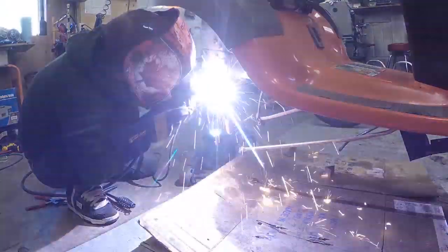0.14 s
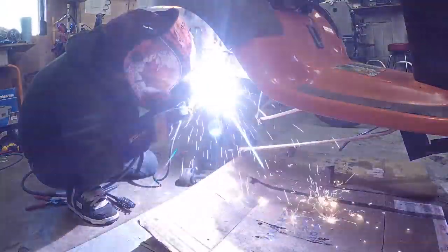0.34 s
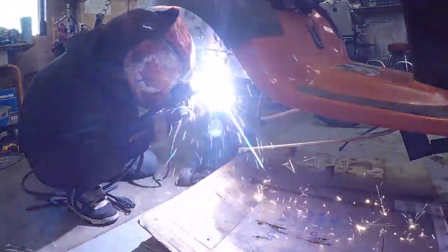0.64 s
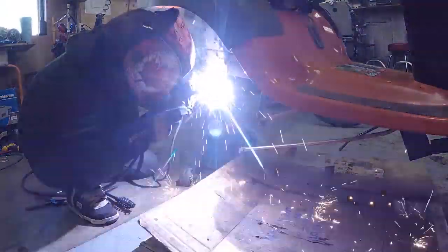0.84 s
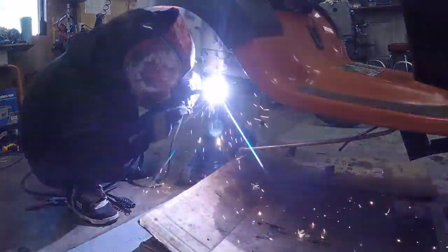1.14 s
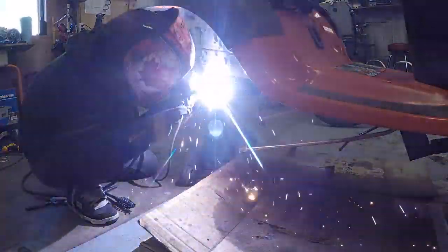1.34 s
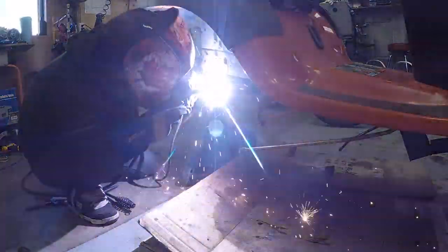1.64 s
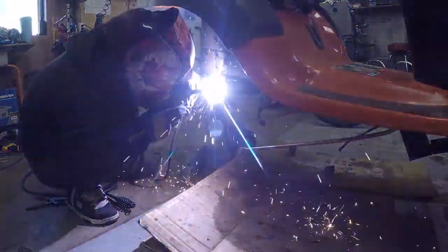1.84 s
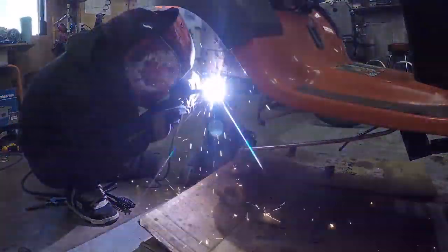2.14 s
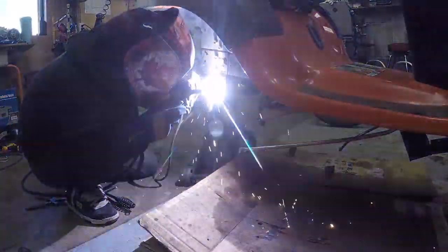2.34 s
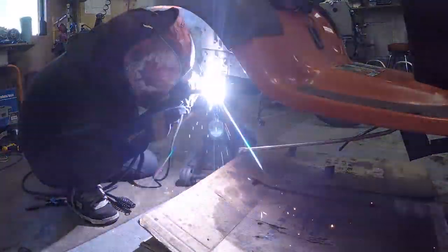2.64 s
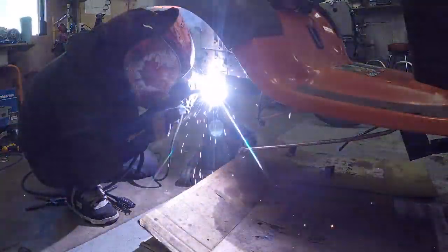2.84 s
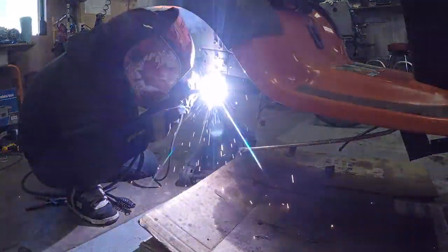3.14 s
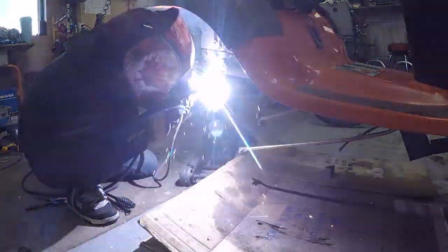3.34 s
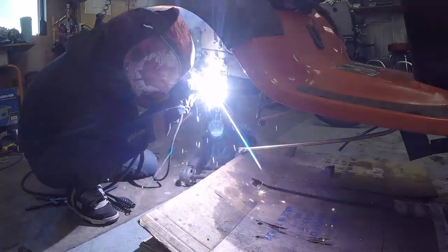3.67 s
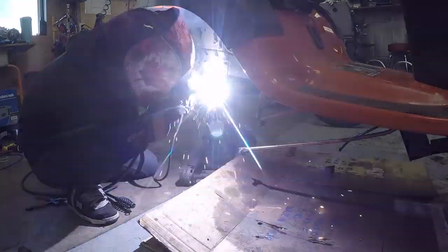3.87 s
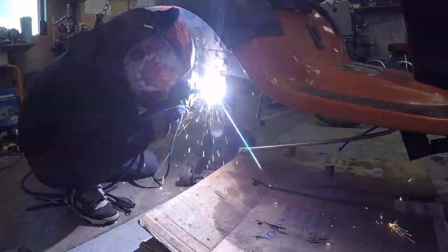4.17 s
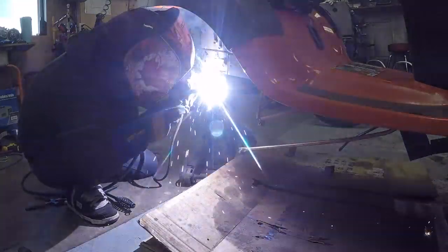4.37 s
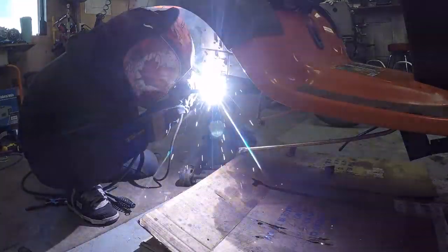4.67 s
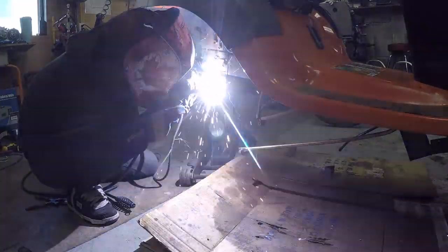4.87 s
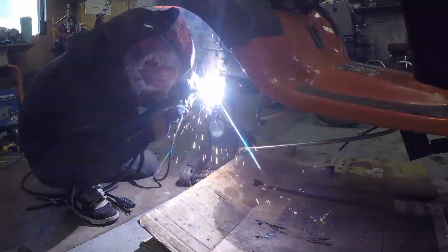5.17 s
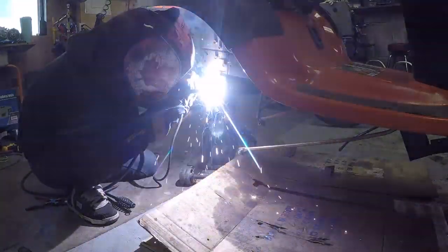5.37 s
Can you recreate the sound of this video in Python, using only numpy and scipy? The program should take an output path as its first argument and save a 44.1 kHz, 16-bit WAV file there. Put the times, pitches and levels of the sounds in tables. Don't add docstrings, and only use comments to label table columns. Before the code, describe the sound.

A crouching welder works an arc on a steel part in a cluttered workshop, heard in mono from fairly close. The arc is burning from the start: dense one-sided sizzle mixed with sharp, irregular pops, dozens each second, bright and slightly metallic. From 0 to 1.8 s it is rough and stuttering, strong at the start and again around 0.9-1.3 s; the crackle repeatedly sinks for under two tenths of a second, then snaps back with a pop. After about 1.8 s it runs quieter and steadier, with fewer stalls. At 3.3 s one pop stands out, much louder and with a dull thump. Moderate crackling continues, with stutters near 4.1, 4.8 and 5.4 s, and is cut off still running at 5.5 s. Beneath it all is a constant low transformer hum, soft deep fan rumble with a slightly wavering tone, and a very faint whine. Quick echoes and a short room tail follow the pops.

```python
import sys
import numpy as np
from scipy import signal
from scipy.fft import rfft, irfft
from scipy.io import wavfile
from scipy.ndimage import uniform_filter1d

SR = 44100
rng = np.random.default_rng(int(sys.argv[2]) if len(sys.argv) > 2 else 0)


def output_pcm(signal):
    pcm = np.clip(np.atleast_2d(signal).T, -1, 1) * 32767
    wavfile.write(sys.argv[1], SR, np.round(pcm).astype(np.int16))


def nominal_scale(level):
    x = np.asarray(level, float) / 20
    return 10 ** x


N = 242991

# [restrike t/s, stall length/s, depth level/dB, restrike peak level/dB]
STALLS = [(0.076, 0.065, -8, -18.5), (0.117, 0.059, -16, -19.5), (0.4396, 0.088, -6.5, -20),
          (0.5873, 0.043, 0.5, -17), (0.7433, .055, -15, -17), (0.862, 0.059, -3, -19.5),
          (1.065, 0.12, -13.5, -19), (1.151, 0.088, -8.5, -24), (1.2026, 0.05, -10, -19),
          (1.431, 0.17, -12, -21.5), (1.704, 0.053, -18, -20.5), (1.75, 0.044, -8, -18),
          (2.106, 0.12, -15, -19), (2.159, 0.054, -1.5, -20.5), (2.3556, 0.023, -25, -14),
          (2.4627, .045, -3, -22.5), (2.788, 0.051, -6.5, -22), (3.0858, 0.087, -9, -26),
          (3.455, 0.078, -8, -19.5), (3.75, 0.079, -6, -27), (3.791, 0.036, -14.5, -20),
          (4.0458, 0.093, -9.5, -22.5), (4.093, 0.054, -12, -21), (4.3265, 0.04, -8, -19.5),
          (4.422, .04, -6.5, -21), (4.7836, 0.16, -8.5, -19.5), (4.881, 0.051, 0, -20),
          (5.104, 0.13, -8.5, -26), (5.338, 0.023, -12, -16), (5.4205, 0.11, -9.5, -15.5)]


def rms_one(x):
    return x / np.sqrt(np.mean(x ** 2) + 1e-20)


def drift(rate_hz):
    r = np.exp(-2 * np.pi * rate_hz / SR)
    noise = rng.standard_normal(N + SR)
    wander = signal.lfilter([1], [1, -2 * r, r * r], noise)
    return rms_one(wander[SR:])


def colour_db(hz, spectrum, lifts):
    points = np.array(spectrum)
    level_db = np.interp(np.log(hz + 1), np.log(points[:, 0]), points[:, 1])
    for centre, width, lift_db in lifts:
        level_db = level_db + lift_db / (1 + (2 * (hz - centre) / width) ** 2)
    return level_db


def causal(level_db):
    cepstrum = irfft(level_db * np.log(10) / 20)
    half = len(cepstrum) // 2
    cepstrum[1:half] *= 2
    cepstrum[half + 1:] = 0
    return np.exp(rfft(cepstrum))


def rumble():
    # [f/Hz, level/dB per Hz]
    air_colour = [(12, -39), (20, 1.5), (119, -6), (166, -6), (232, -4), (281, -8), (332, -2.5), (401, -12),
                  (784, -27), (1140, -29.5), (1570, -31), (1970, -32), (3000, -28), (3900, -34),
                  (6600, -120)]
    # [f/Hz, width/Hz, lift level/dB]
    booms = [(28, 3, -11), (44.5, 8.1, 8), (72.3, 6.7, 12), (86, 3.2, 11), (204, 33, 2.5), (230, 48, 3),
             (343, 4.4, -2), (633, 44, 4)]
    hz = np.fft.rfftfreq(N, 1 / SR)
    air = rfft(rng.standard_normal(N)) * nominal_scale(colour_db(hz, air_colour, booms))
    deep = hz < 105
    cabinet = abs(hz - 209) < 19
    steady = irfft(air * ~(deep | cabinet), N) / np.std(irfft(air, N))
    deep_db = -33 + 0.2 * drift(0.65)
    cabinet_db = -41.5 + 1.4 * drift(4.2)
    out = nominal_scale(-33) * steady
    for band, level_db in [(deep, deep_db), (cabinet, cabinet_db)]:
        out += nominal_scale(level_db) * rms_one(irfft(air * band, N))
    return out


def hum():
    harmonics_db = [-39.5, -31.5, -43.5, -35, -46.5, -44.5, -53, -97]
    mains_hz, fan_hz, whine_hz = 59.985, 327.86, 1746.84
    t = np.arange(N) / SR
    start = rng.uniform(0, 2 * np.pi, 10)
    lines = np.zeros(N)
    for k, level_db in enumerate(harmonics_db):
        line = np.sin(2 * np.pi * (k + 1) * mains_hz * t + start[k])
        lines += nominal_scale(level_db + 0.3 * drift(4)) * line
    fan = nominal_scale(-37.5 + 1.4 * drift(8.1)) * np.sin(2 * np.pi * fan_hz * t + 0.19 * drift(4.7))
    whine = nominal_scale(-60) * np.sin(2 * np.pi * whine_hz * t + 0.2 * drift(5.5))
    return np.sqrt(2) * (lines + fan + whine)


def path():
    # [delay t/ms, level/dB]
    near_echoes = [(0.0, -1), (.34, -8), (.49, -4), (1.03, 0), (1.25, -4), (1.42, -4), (1.66, -9),
                   (1.88, -6), (2.49, -11), (3.45, -10), (4.33, -10), (6.01, -9), (7.55, -8)]
    # [delay t/ms, spread/ms, level/dB]
    clutter = [(2.2, 1.0, -23), (7.4, 1.5, -22), (18, 1.5, -32)]
    # [f/Hz, level/dB per Hz]
    pop_colour = [(180, -23.5), (400, 1.5), (790, -11.5), (1400, -17.5), (2710, -5), (3600, -9.5),
                  (4940, -3.5), (6670, -11), (7590, -8.5), (9270, -14), (11200, -15), (12200, -13.5),
                  (14000, -8), (15300, -14)]
    # [f/Hz, width/Hz, lift level/dB]
    steel_rings = [(1140, 90, 13), (1975, 70, 7), (2310, 70, 2), (2760, 200, 5), (4240, 140, 4),
                   (4470, 60, 4), (4820, 90, 2), (5020, 130, 9), (5450, 120, 3), (7030, 100, 4),
                   (7330, 90, 3), (7690, 110, 6), (8550, 150, 3), (10200, 250, 4), (13000, 400, 2)]
    room_db, room_t60_s, room_top_t60_s = -25.5, 0.44, 0.38
    size = 2 ** 15
    ms = np.arange(size) * 1000 / SR
    hz = np.fft.rfftfreq(size, 1 / SR)

    noise = rng.standard_normal(size)
    dull = signal.sosfilt(signal.butter(2, 5000, fs=SR, output="sos"), noise)
    scatter = sum(nominal_scale(db) * np.exp(-0.5 * ((ms - at) / spread) ** 2) for at, spread, db in clutter)
    tail = dull * nominal_scale(-0.06 * ms / room_t60_s)
    tail += (noise - dull) * nominal_scale(-0.06 * ms / room_top_t60_s)
    room = nominal_scale(room_db) * tail * np.clip(ms / 8.1, 0, 1)
    diffuse = (noise * scatter + room) * (ms > 0.1)

    echoes = sum(nominal_scale(db) * np.exp(-2j * np.pi * hz * at / 1000) for at, db in near_echoes)
    arrivals = rfft(diffuse) + echoes
    broad_db = 10 * np.log10(uniform_filter1d(abs(arrivals) ** 2, size=450))
    pop = irfft(arrivals * causal(colour_db(hz, pop_colour, steel_rings) - broad_db))
    return pop / abs(pop).max()


def vigour_db():
    # [t/s, level/dB]
    vigour = [(0.0, -30.5), (0.14, -31), (0.27, -33.5), (0.62, -36.5), (0.8, -35), (0.95, -31.5),
              (1.27, -32), (1.57, -34.5), (1.8, -39), (1.95, -35.5), (2.6, -37), (2.92, -34.5),
              (3.2, -36.5), (3.6, -35), (3.92, -33.5), (4.4, -36.5), (4.92, -34.5), (5.51, -34)]
    sink_s, recover_s = 0.012, 0.033
    linger = 0.77
    t = np.arange(N) / SR
    level_db = np.interp(t, *np.transpose(vigour))
    for end, length, depth_db, _ in STALLS:
        sunk = 1 - np.exp(-np.clip(t - end + length, 0, length) / sink_s)
        healing = linger * np.exp(-np.clip(t - end, 0, None) / recover_s)
        level_db = level_db + depth_db * sunk * np.where(t < end, 1, healing)
    return level_db


def droplets(level_db):
    gap, size = rng.standard_normal((600, 2)).T
    t = np.cumsum(0.017 * np.exp(0.6 * gap))
    heard = t < (N - 1) / SR
    t, size = t[heard], size[heard]
    peak_db = level_db[(t * SR).astype(int)] + 11.5 + 3.5 * np.minimum(size, 1)
    return t, peak_db


def arc():
    # [t/s, peak level/dB]
    loud_pops = [(0.2033, -22), (0.2362, -17.5), (0.2499, -17), (0.2737, -17), (0.2911, -16), (0.3158, -16),
                 (0.373, -16), (0.6456, -15.5), (0.759, -17), (0.9184, -16), (0.933, -15), (0.964, -17),
                 (0.9752, -15), (1.2693, -16.5), (1.2961, -17), (1.5398, -15), (1.5818, -20), (1.9892, -26),
                 (2.5769, -18.5), (2.6465, -17.5), (2.7526, -19), (2.978, -18), (3.2289, -17.5),
                 (3.3135, -9.5), (3.3757, -27), (3.9631, -18.5), (4.6466, -17), (5.0022, -16.5),
                 (4.9444, -23), (5.1858, -17.5)]
    hush_db, hush_s = -70, 0.008
    body_db, body_hz, body_s = 8.0, 3520, 0.0066
    pop = path()
    level_db = vigour_db()

    restrikes = np.transpose(STALLS)[[0, -1]]
    t, peak_db = np.hstack([droplets(level_db), np.transpose(loud_pops), restrikes])
    clear = np.zeros(N)
    clear[(t * SR).round().astype(int).clip(0, N - 1)] = nominal_scale(peak_db + 2.5)

    r = np.exp(-1 / (hush_s * SR))
    short_circuit = signal.lfilter([0, 1], [1, -r], clear[::-1])[::-1]

    sizes = nominal_scale(2.66 * np.minimum(rng.exponential(1, N), 4))
    pops_per_s = 600 * nominal_scale(3.0 * drift(25))
    small = sizes * (rng.random(N) < pops_per_s / SR)
    small = rms_one(small) * nominal_scale(level_db + 3.5 + hush_db * short_circuit)

    dull = signal.sosfilt(signal.butter(2, body_hz, fs=SR, output="sos"), pop)
    body = dull * np.exp(-np.arange(len(pop)) / SR / body_s)
    out = signal.fftconvolve(clear, pop)[:N]
    out += nominal_scale(body_db) * signal.fftconvolve(clear ** 2, body)[:N]

    dealt = rng.integers(0, 4, N)
    for k, way in enumerate([pop, pop, path(), path()]):
        out += signal.fftconvolve(small * (dealt == k), way / np.sqrt(np.sum(way ** 2)))[:N]
    return out


def scene():
    return (rumble() + hum() + arc())[None]


def top_cut(x):
    return signal.sosfilt(signal.butter(12, 15370, fs=SR, output="sos"), x)


def record(dry):
    return top_cut(dry)


dry = scene()
out = record(dry)
output_pcm(out)
```